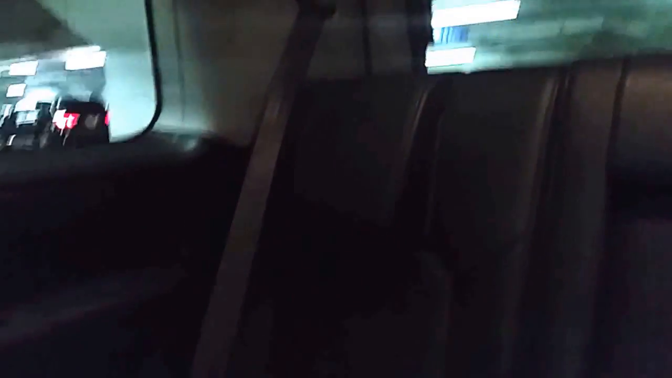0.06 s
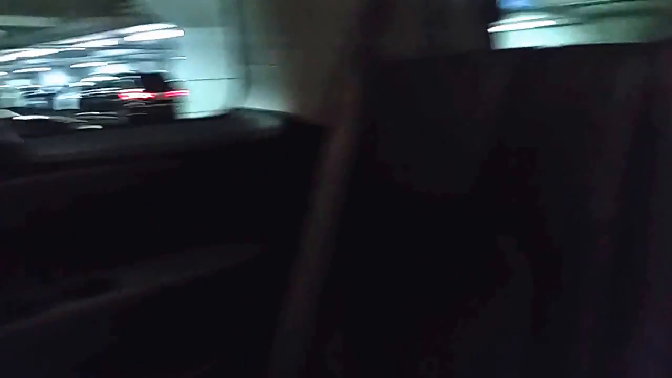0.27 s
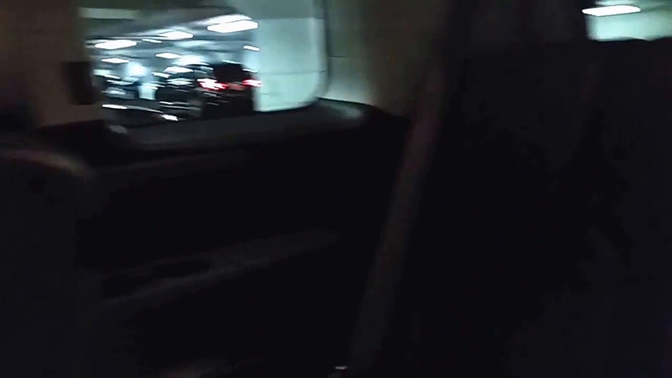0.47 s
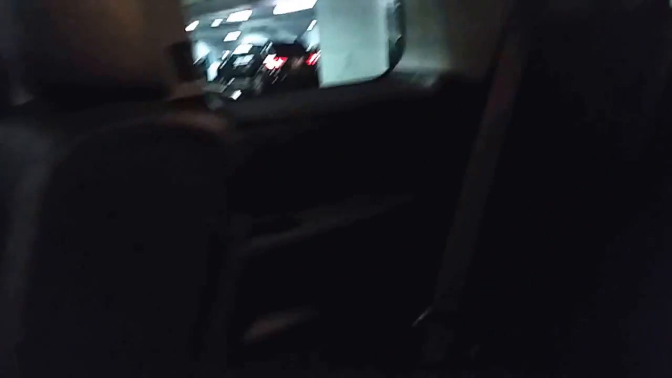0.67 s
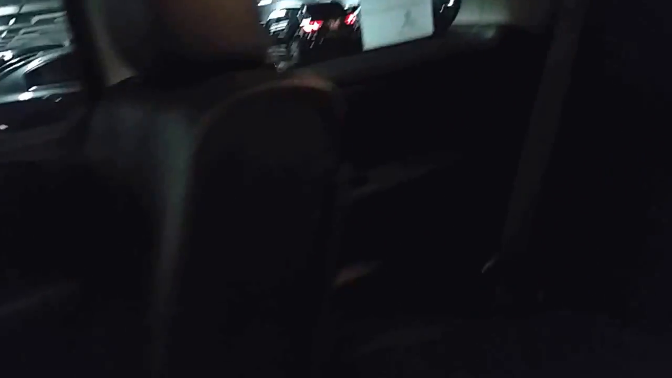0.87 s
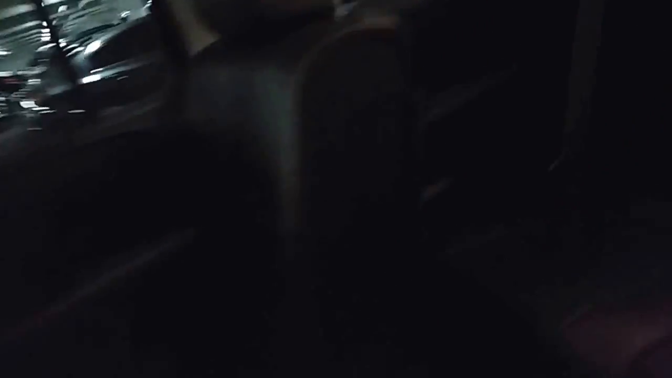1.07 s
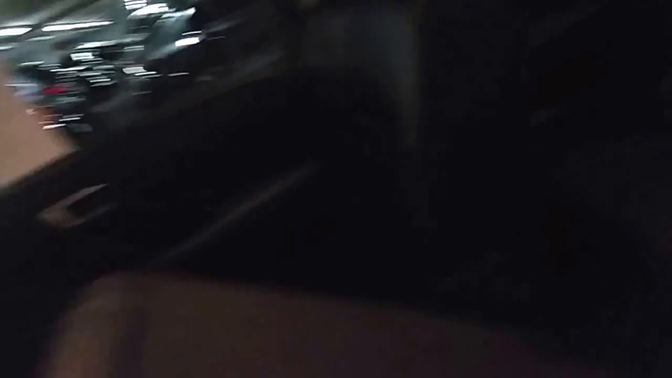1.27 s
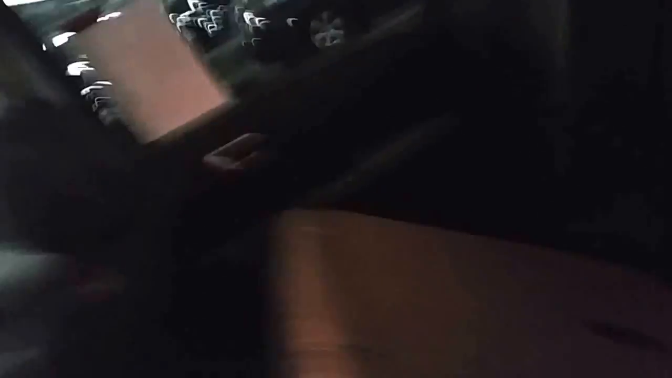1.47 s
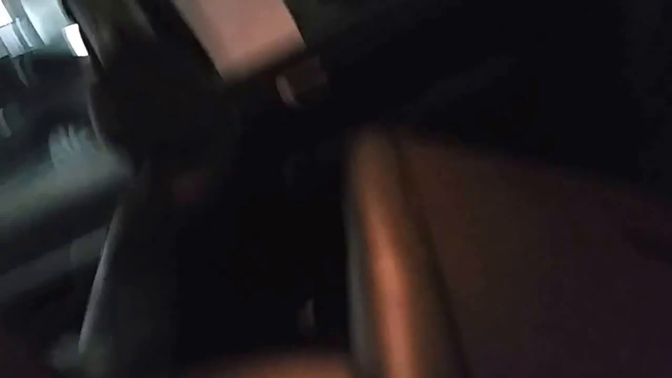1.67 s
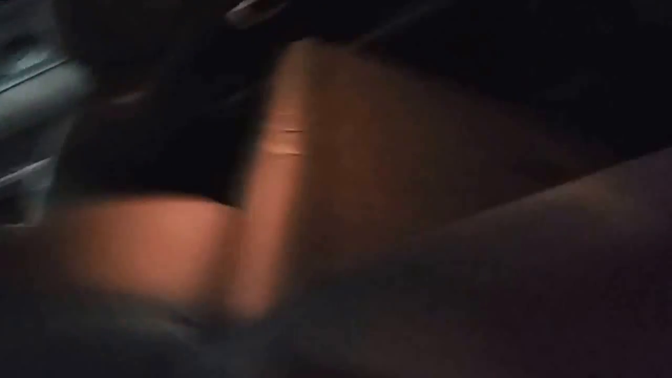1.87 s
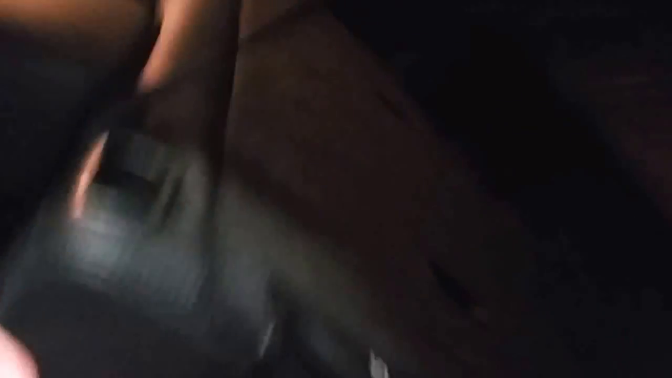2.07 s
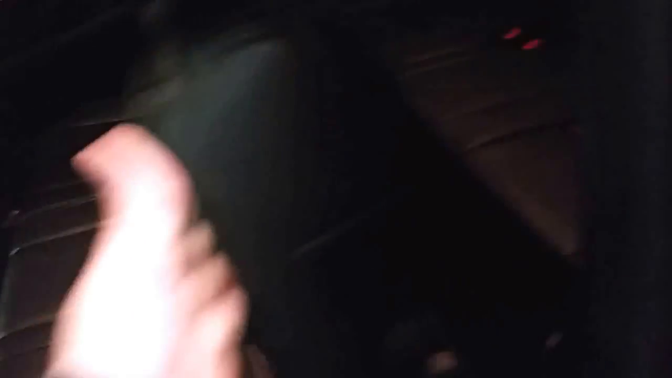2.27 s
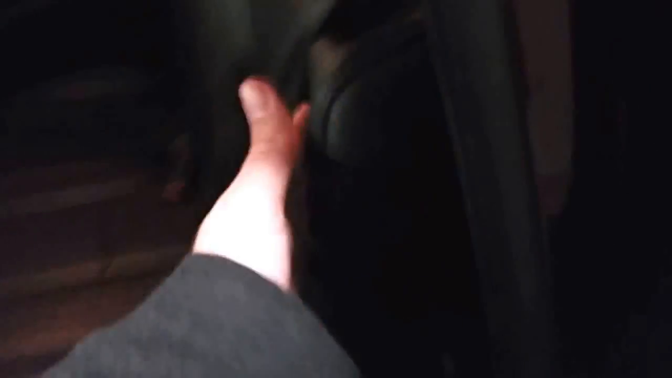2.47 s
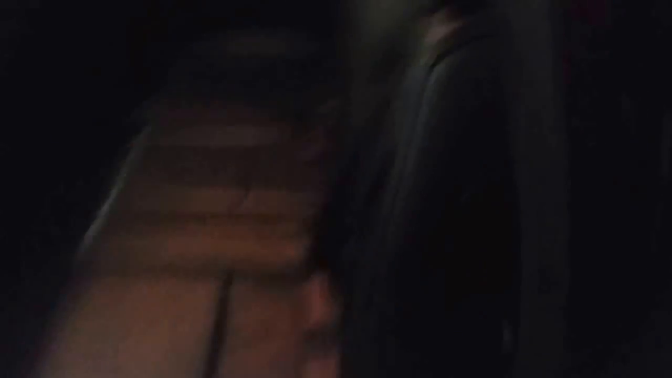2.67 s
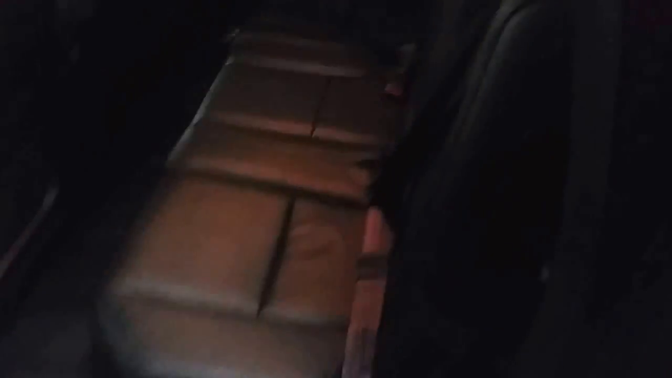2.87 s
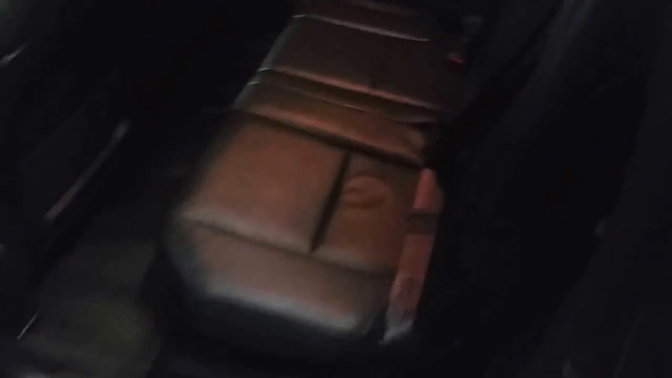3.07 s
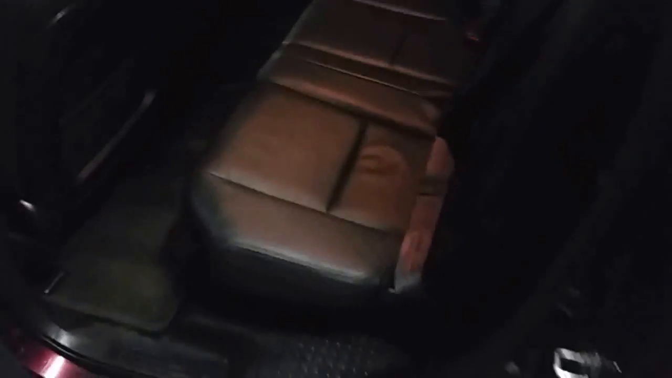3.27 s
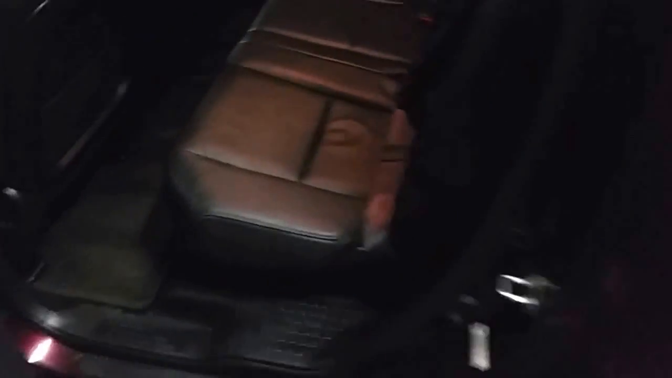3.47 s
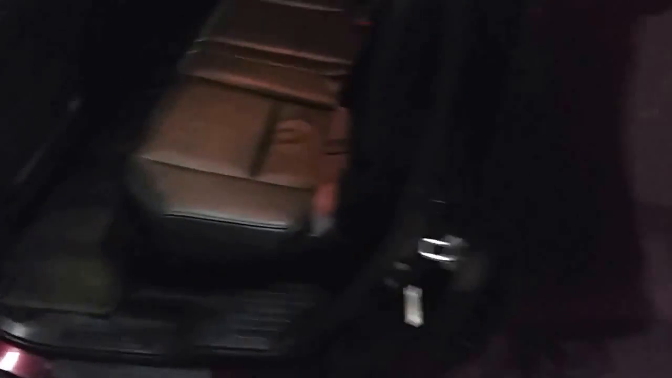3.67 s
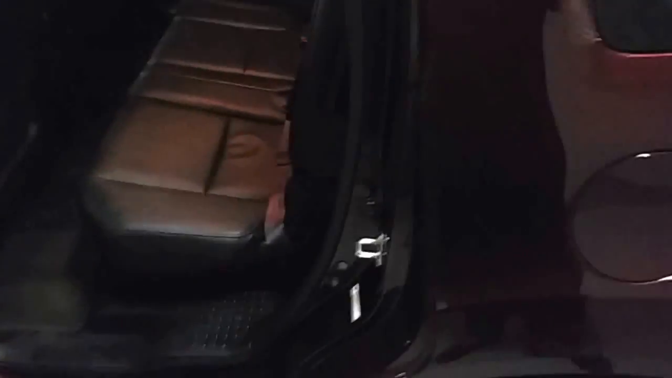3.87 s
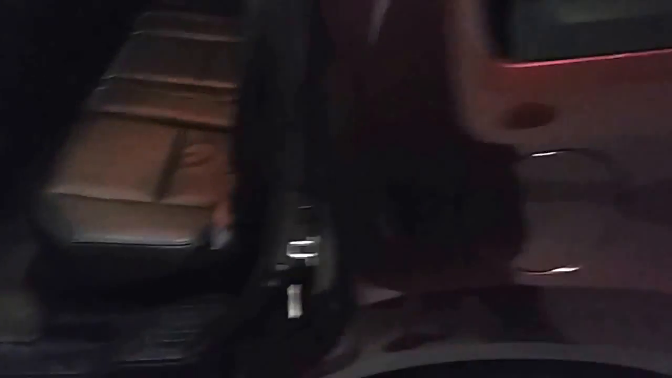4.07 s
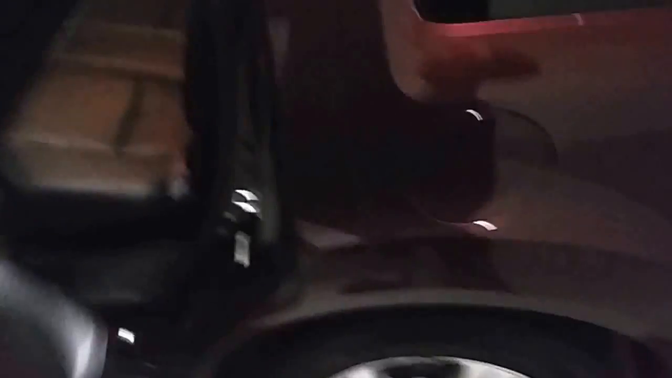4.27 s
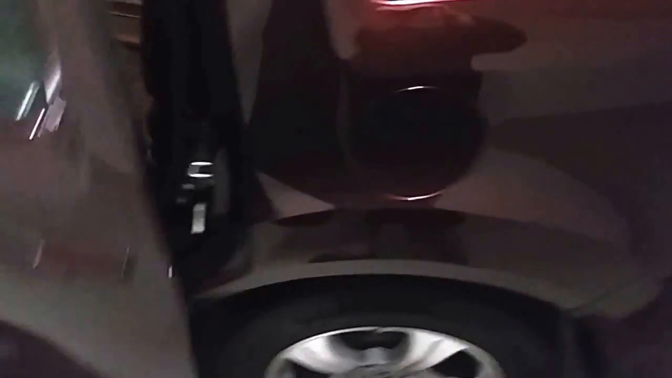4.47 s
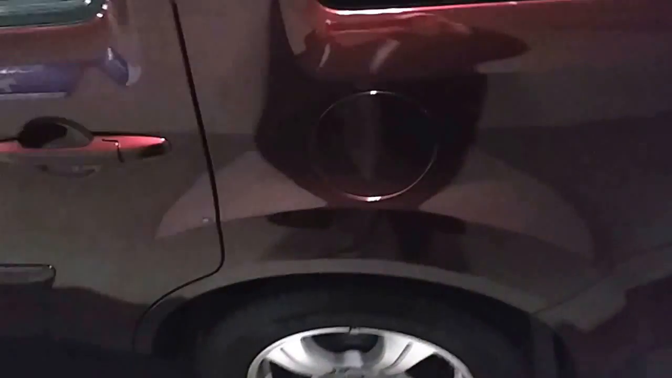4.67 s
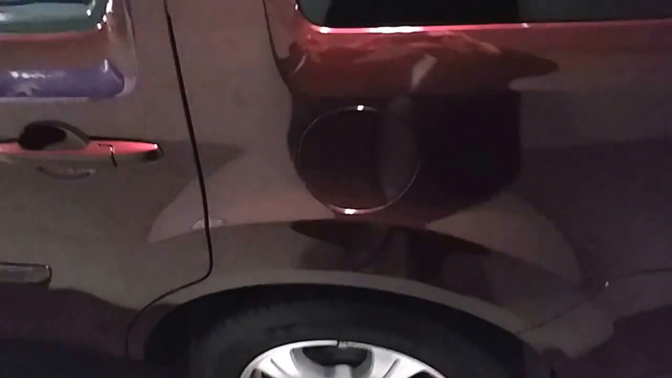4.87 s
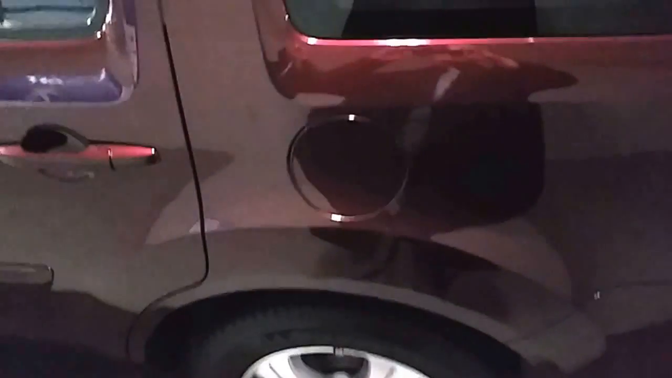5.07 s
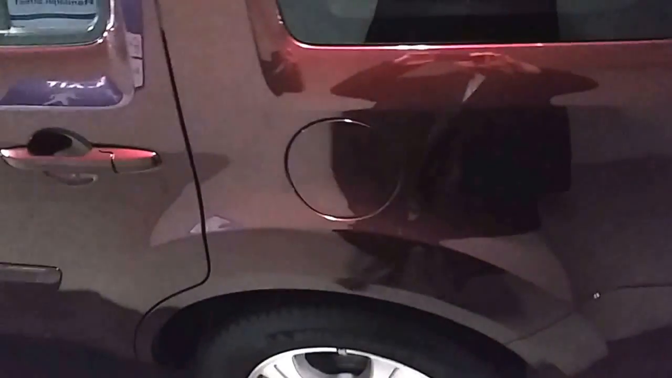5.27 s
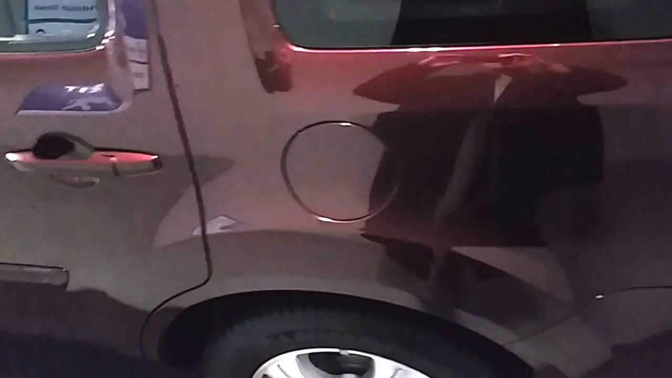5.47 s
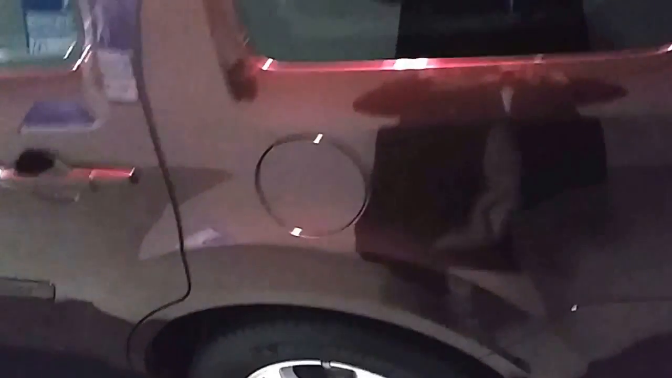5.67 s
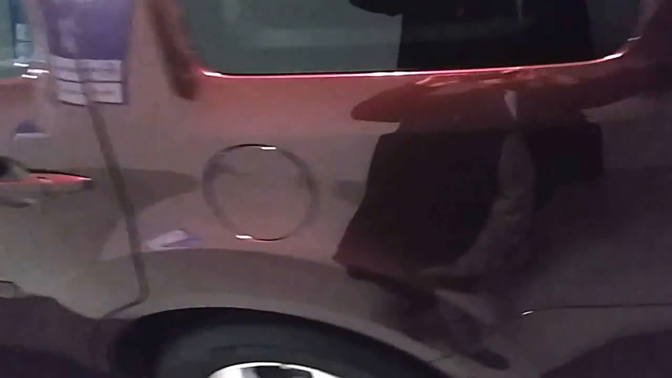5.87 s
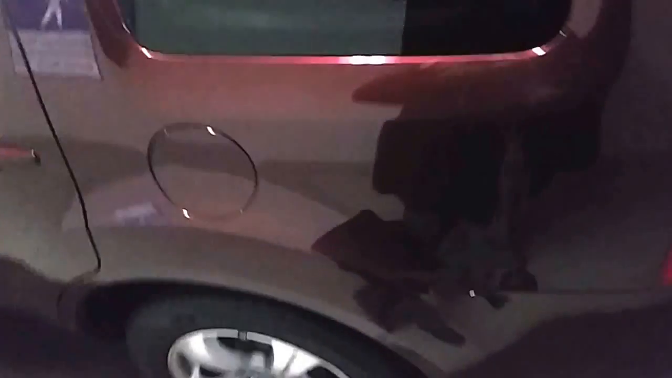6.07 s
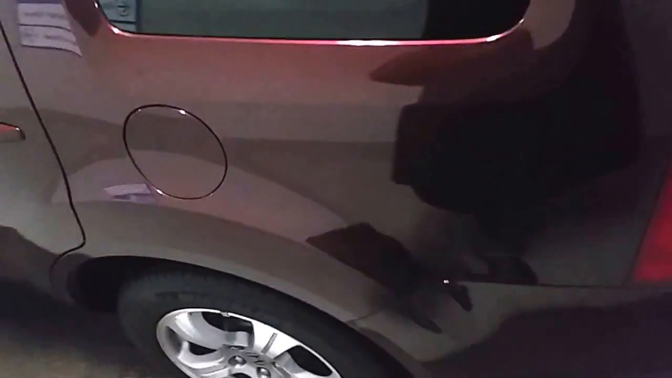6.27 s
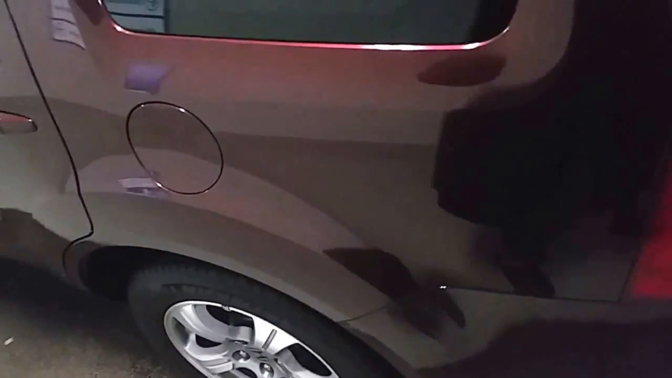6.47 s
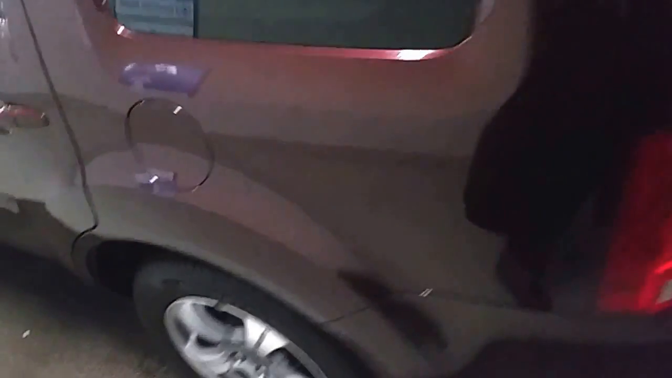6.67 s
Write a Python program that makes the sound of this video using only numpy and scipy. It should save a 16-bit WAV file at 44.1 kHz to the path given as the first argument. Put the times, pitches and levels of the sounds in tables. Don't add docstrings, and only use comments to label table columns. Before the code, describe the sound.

Close, hand-held stereo pickup with uneven coloration between channels. Dull taps come first over steady low garage air, then light knocks and a crisp latch. A heavy folding seat crashes in a cluster of low blows with spring squeaks. Tiny clicks and high creaks precede a single massive door slam with a metallic latch ring and deep hum, fading into rumble before a few palm bumps.

```python
import sys
import numpy as np
from scipy import signal
from scipy.fft import rfft, irfft, next_fast_len
from scipy.io import wavfile
from scipy.ndimage import uniform_filter1d, map_coordinates

SR = 44100
rng = np.random.default_rng(int(sys.argv[2]) if len(sys.argv) > 2 else 0)


def attenuation_scalar(level_db):
    decades = np.asarray(level_db, float) / 20
    return 10 ** decades


def pcm_store(signal):
    levels = np.round(np.clip(np.atleast_2d(signal), -1, 1) * 32767)
    wavfile.write(sys.argv[1], SR, levels.astype(np.int16).T)


N = 296325
TIME = np.arange(N) / SR

# [f/Hz, likeness 0..1]
DIFFUSE = [(60, 0.85), (180, 0.99), (550, 0.53), (1300, 0.18), (3500, 0.075), (15000, .05)]
# [f/Hz, level/dB]
HISS = [(500, -56), (1500, -6), (3000, -1), (6000, 0.5), (11000, -4.5), (16000, 0)]
# [t/s, level/dB]
OPEN = [(0.0, -17.5), (0.32, -15.5), (0.47, -10.5), (0.94, -1.5), (1.6, 0), (1.85, 1.5), (2.1, -1),
        (2.5, 0.5), (3.0, -2), (3.4, 0.5), (4.5, 1.5), (4.79, -2.5), (5.0, -9), (5.29, -4), (5.61, 1.5),
        (6.72, 1)]
# [f/Hz, width/Hz, level/dB]
DOOR = [(31, 9.6, 2), (61.3, 5.8, 3), (79, 20, -4.5), (112.4, 16, 1), (163.5, 26, -4), (222.3, 23, -2.5),
        (268, 22, -15)]


def unit(x):
    return x / np.sqrt(np.mean(x ** 2) + 1e-20)


def along(points, hz):
    f, v = np.transpose(points)
    return np.interp(np.log(hz + 1), np.log(f + 1), v)


def curve(points):
    s, v = np.transpose(points)
    return np.interp(TIME, s, v)


def wobble(rate):
    knots = rng.standard_normal(int(N * rate / SR) + 4)
    return map_coordinates(knots, [TIME * rate])


def filtered(x, response):
    m = next_fast_len(x.shape[-1] + 8192)
    return irfft(rfft(x, m) * response(np.fft.rfftfreq(m, 1 / SR)), m)[..., :x.shape[-1]]


def shaped(points):
    return lambda hz: attenuation_scalar(along(points, hz))


def resonances(modes):
    def response(f):
        total = 0
        for k, (centre, width, db) in enumerate(modes):
            damping = 1j * f * width
            total = total + (-1) ** k * attenuation_scalar(db) * damping / (centre ** 2 - f * f + damping)
        return total
    return response


def causal(points):
    cep = irfft(np.log(attenuation_scalar(along(points, np.fft.rfftfreq(2048, 1 / SR)))))
    cep[1:1024] *= 2
    cep[1025:] = 0
    return irfft(np.exp(rfft(cep)))


def rush(colour, alike, patchy_db, lag=0):
    z = signal.stft(rng.standard_normal((2, N)), nperseg=512)[2]
    field = uniform_filter1d(rng.standard_normal(z.shape[1:]), size=6, axis=0)
    field = uniform_filter1d(field, size=12, axis=1)
    pair = signal.istft(z * attenuation_scalar(patchy_db * unit(field)), nperseg=512)[1][:, :N]

    def spread(hz):
        turn = np.arccos(np.clip(along(alike, hz), -1, 1)) / 2
        return colour(hz) * np.array([np.cos(turn), np.sin(turn)])

    mid, side = filtered(pair, spread)
    return unit(np.array([mid + side, np.roll(mid - side, round(lag * SR))]))


def steady(x):
    power = uniform_filter1d(np.mean(x ** 2, 0), round(0.0404 * SR))
    return x / np.sqrt(np.abs(power) + 0.055)


def add(track, s, sound):
    at = track[..., round(s * SR):][..., :sound.shape[-1]]
    at += sound[..., :at.shape[-1]]


def swell(s, rise, t60, hold=0):
    t, shape = TIME[:round((hold + 2 * t60) * SR)], np.zeros(N)
    decay = np.exp(-np.log(1000) * np.clip(t - hold, 0, None) / t60)
    add(shape, s, (1 - np.exp(-t / rise)) * decay)
    return shape


def garage_air():
    # [f/Hz, level/dB]
    rumble_colour = [(20, -0.5), (45, -1), (100, 2.5), (170, -1), (260, -8), (420, -12.5), (800, -18.5),
                     (2000, -52)]
    # [f/Hz, level/dB]
    drone_colour = [(150, -10), (330, 1), (500, -7), (640, -3), (720, 0.5), (830, 1), (930, -4), (1300, -6),
                    (1520, -7.5), (1640, -4), (1780, -8.5), (2700, -10), (5000, -18.5), (12000, -27.5)]
    # [t/s, level/dB]
    lean_out = [(0, 0), (1.45, 0), (1.6, -2), (1.9, -2), (2.1, 0), (3.6, 0), (3.9, -2), (4.25, -2),
                (4.6, 0), (5.1, -1), (5.5, 0), (6.72, 1)]
    open_db, lean_db = curve(OPEN), curve(lean_out)
    outside = np.clip((TIME - 2.73) / 1.3, 0, 1)
    rolls = sum(attenuation_scalar(db) * swell(s, 0.037, 0.88) for s, db in [(2.24, -23), (4.45, -27.5)])
    rumble_db = -35.5 + 0.064 * open_db - 3.5 * outside + lean_db
    drone_db = -41 + 0.53 * open_db + 3 * outside - 0.45 * lean_db
    rumble = rush(shaped(rumble_colour), DIFFUSE, patchy_db=0.23, lag=0.00013)
    drone = rush(shaped(drone_colour), DIFFUSE, patchy_db=1.0, lag=0.00015)
    return np.hypot(attenuation_scalar(rumble_db), rolls) * rumble + attenuation_scalar(drone_db) * drone


def air_hiss():
    return attenuation_scalar(-42.5 + curve(OPEN)) * rush(shaped(HISS), DIFFUSE, patchy_db=1.6)


def cabin_hum():
    # [f/Hz, level/dB, t60/s]
    modes = [(29.88, -17.5, 1.62), (58.5, -17.5, 1.47), (63, -21, 0.85), (228.4, -25, 0.86)]
    t = np.clip(TIME - 4.366, 0, None)
    hum = 0
    for hz, db, t60 in modes:
        tone = np.sin(2 * np.pi * hz * t + 0.6 * wobble(9))
        hum = hum + attenuation_scalar(db - 60 * t / t60) * (1 - np.exp(-t / 0.044)) * tone
    return hum


def cloth_rub():
    # [t/s, length/s, level/dB, brightness/dB]
    strokes = [(0.866, 0.13, -37.5, 0), (1.001, .03, -38.5, -5), (1.057, .16, -42, -2),
               (1.028, 0.44, -44.5, 0), (1.368, 0.055, -37, 3), (1.476, 0.026, -46, 4),
               (1.748, 0.19, -42.5, -1), (2.097, 0.011, -26, 2), (2.225, 0.011, -29, -1),
               (2.3, 0.21, -41.5, -0.5), (3.21, 0.13, -46, 0), (3.35, .06, -52, 6), (3.41, 0.048, -49, 10),
               (4.393, .015, -37, -3)]
    noise = rush(shaped(HISS), DIFFUSE, patchy_db=1.6)
    dull = filtered(noise, lambda hz: 1 / (1 + (hz / 8000) ** 4))
    bright = noise - dull
    grains = attenuation_scalar(1.0 * wobble(29.66) + 2.0 * wobble(250))
    dull_gain, bright_gain = np.zeros((2, N))
    for s, length, db, bright_db in strokes:
        stroke = swell(s, 0.0063, 0.15, length)
        dull_gain += attenuation_scalar(db - bright_db) * stroke
        bright_gain += attenuation_scalar(db + bright_db) * stroke
    return grains * (dull * dull_gain + bright * bright_gain)


def case_knocks(rows, ring_hz, width_hz, plain):
    track, t = np.zeros((2, N)), np.arange(2048) / SR
    late = np.clip(t - .0015, 0, None)
    push = late * np.exp(-late / 0.00042) - .5 * t * np.exp(-t / 0.000087)
    knock = filtered(push, resonances([(ring_hz, width_hz, 0)]))
    knock = knock / np.abs(knock).max() + plain * push / push.max()
    knock = knock / np.abs(knock).max()
    tick = -np.exp(-t / 0.00016) * np.cos(2 * np.pi * 1500 * t)
    for s, db, tick_db, pan_db in rows:
        add(track, s, attenuation_scalar(db) * (knock + attenuation_scalar(tick_db) * tick) * attenuation_scalar([[pan_db / 2], [-pan_db / 2]]))
    return track


def hand_on_phone():
    # [t/s, peak level/dB, tick level/dB, left over right/dB]
    taps = [
        (0.2077, -36, -14, 16),
        (0.2718, -18.5, -11.5, 11),
        (0.325, -19, -16, 11),
        (0.3955, -20, -14, 13),
        (0.454, -17.5, -2.5, 7.5),
        (0.7566, -23.5, 5, 15.5),
        (1.149, -21, 1, 13),
    ]
    # [t/s, peak level/dB, tick level/dB, left over right/dB]
    bumps = [
        (5.4525, -25, -35, 13),
        (5.4675, -19.5, -32, 21),
        (5.4857, -20, -32, 22),
        (5.942, -29, -30, 21),
    ]
    return case_knocks(taps, 403, 150, 1.06) + case_knocks(bumps, 138, 85, -.15)


def held_ring(db, start_hz, end_hz, length, width_hz, firm):
    t = np.arange(round((2 * length + 0.12) * SR)) / SR
    drive = rng.standard_normal((3, len(t)))
    slow = filtered(drive, lambda f: 1 / (1 + (2 * f / width_hz) ** 2))
    phase = 2 * np.pi * np.cumsum(start_hz + (end_hz - start_hz) * np.clip(t / length, 0, 1)) / SR
    across = slow[1] + 0.24 * np.array([slow[2], -slow[2]])
    tone = unit((firm * np.std(slow) + slow[0]) * np.cos(phase) + across * np.sin(phase))
    fade_t60 = 0.029 + 1.7 * length
    shape = (1 - np.exp(-t / 0.00031)) * attenuation_scalar(-60 * np.clip(t - length, 0, None) / fade_t60)
    return attenuation_scalar(db - 6.0) * tone * shape


def creaks():
    # [t/s, peak level/dB, f/Hz, length/s]
    events = [
        (3.36, -35, 11400, .006),
        (3.374, -33, 14000, .003),
        (3.397, -30.5, 13000, .003),
        (3.411, -26, 11400, 0.0036),
        (3.438, -27.5, 12500, 0.0085),
    ]
    track = np.zeros((2, N))
    for s, db, hz, length in events:
        add(track, s, held_ring(db, hz, hz, length, .24 * hz, firm=.45))
    return track


def squeaks():
    # [t/s, peak level/dB, start f/Hz, end f/Hz, length/s]
    events = [(1.012, -41, 1400, 1300, .018), (1.05, -35, 950, 950, .008), (1.085, -39, 1350, 1620, .025),
              (1.093, -39, 2400, 2400, .015), (1.402, -26, 2500, 2200, 0.0077),
              (1.446, -35, 6800, 6800, 0.01), (2.141, -22, 3520, 3750, 0.0071),
              (2.159, -20.5, 3900, 3540, 0.0031), (2.305, -35.5, 2150, 2280, 0.035),
              (2.333, -31, 2140, 2250, .006), (2.348, -29, 2110, 2310, .008),
              (2.372, -27, 2330, 2400, 0.015), (2.394, -28, 2380, 2450, 0.011),
              (2.358, -34, 2024, 2135, 0.042), (2.43, -38, 2080, 2050, 0.05),
              (2.49, -41, 1890, 1910, 0.048), (2.58, -48, 2010, 1935, 0.1), (3.237, -36, 5000, 4060, .009),
              (3.3, -52, 6800, 6800, .07), (3.457, -46, 6800, 6800, .025), (4.3905, -22, 3620, 3520, .002),
              (2.142, -31, 1800, 1800, .008), (2.235, -32, 1950, 1960, .006),
              (2.236, -32, 4500, 4500, .005)]
    track = np.zeros((2, N))
    for s, db, start_hz, end_hz, length in events:
        width_hz = 530 / (1 + length / .07)
        add(track, s, held_ring(db, start_hz, end_hz, length, width_hz, firm=.45))
    return track


def pings():
    # [t/s, peak level/dB, f/Hz, length/s]
    events = [
        (4.352, -21, 493, 0.006),
        (4.357, -22, 1180, 0.0069),
        (4.382, -16.5, 760, 0.0043),
        (1.412, -28, 850, .004),
        (1.408, -24, 423, .004),
        (1.432, -23, 557, 0.0045),
        (1.4405, -31, 1900, 0.0043),
        (2.033, -12.5, 478, 0.0076),
    ]
    track = np.zeros((2, N))
    for s, db, hz, length in events:
        add(track, s, held_ring(db, hz, hz * (1 - 0.069), length, 0.63 * hz, firm=1.2))
    return track


def clean_rings(rows):
    track = np.zeros(N)
    for s, db, start_hz, end_hz, rise in rows:
        u = np.arange(round(9 * rise * SR)) / (rise * SR)
        glide = np.clip(u / 3.97, 0, 1)
        phase = 2 * np.pi * np.cumsum(start_hz + (end_hz - start_hz) * glide) / SR
        add(track, s, attenuation_scalar(db) * u * np.exp(1 - u) * np.sin(phase))
    return track


def strikes():
    # [t/s, peak level/dB, start f/Hz, end f/Hz, rise/s]
    events = [(4.3424, -13, 1290, 1210, 0.0011), (4.3458, -7.5, 1040, 1000, .0012),
              (4.349, -16, 1015, 960, .0025), (4.343, -17.5, 562, 480, 0.0041),
              (4.345, -22, 1950, 1950, .002), (4.3435, -15, 800, 760, .002), (4.344, -19, 1580, 1520, .002),
              (4.365, -15, 1250, 1200, .001), (4.3655, -15, 1740, 1650, .0012),
              (4.369, -17, 960, 900, .002), (4.3898, -17, 3640, 3550, .0012),
              (4.389, -19, 1600, 1550, .0015), (4.398, -20, 1180, 1120, .002),
              (1.038, -19, 400, 170, .0065), (1.027, -31, 720, 620, .003), (1.099, -21, 300, 260, .004),
              (1.11, -20, 210, 170, .004), (1.2815, -27, 2900, 2450, .0008), (1.086, -19, 460, 390, 0.0048),
              (1.092, -25, 780, 720, .003), (1.444, -21, 260, 240, .004), (1.444, -25, 566, 537, .003),
              (1.452, -29, 1100, 1080, .0015), (1.466, -20, 250, 230, .004), (1.466, -24, 580, 560, 0.0018),
              (1.481, -24, 240, 200, .003), (1.481, -26.5, 560, 580, 0.0026)]
    return clean_rings(events)


def thrums():
    # [t/s, peak level/dB, start f/Hz, end f/Hz, rise/s]
    events = [(2.102, -17.5, 280, 260, .007), (2.108, -18.5, 400, 390, .008),
              (2.15, -20.5, 510, 500, 0.0057), (2.186, -12.5, 200, 240, .011), (2.205, -18, 62, 58, .02),
              (2.165, -14.5, 125, 150, .014), (1.952, -23, 330, 430, .006), (1.972, -24, 130, 150, .008),
              (2.226, -13.5, 210, 165, .011), (2.228, -17.5, 330, 330, 0.0078),
              (2.298, -18.5, 395, 400, .009), (2.325, -16.5, 149, 139, 0.011), (2.33, -20, 234, 216, .01),
              (2.425, -18.5, 190, 185, .011), (4.4, -12.5, 260, 235, 0.0097), (4.44, -17.5, 150, 140, .012),
              (4.45, -16, 85, 70, .011), (4.5, -20, 55, 50, .025), (4.59, -26.5, 230.5, 225, 0.017)]
    return clean_rings(events)


def clacks():
    # [t/s, peak level/dB, tilt/dB per octave, t60/s]
    events = [(1.028, -31, -5, 0.07), (1.0895, -24, -4.5, 0.055), (1.18, -38, -4, 0.045),
              (1.2596, -29, -3, 0.055), (1.283, -31, -2, 0.06), (1.4019, -18, -1.5, 0.032),
              (1.4098, -13, -1, 0.06), (1.4415, -18, -1.5, 0.061), (1.4647, -20, -2, 0.016),
              (1.4795, -20.5, -2.5, 0.018), (1.9854, -12, -5, 0.038), (2.024, -20, -5, 0.038),
              (2.0336, -5.5, -3.5, 0.04), (2.084, -25, -3, .04), (2.0909, -4.5, -3, 0.055),
              (2.1446, -26, -6, 0.06), (2.18, -26.5, -9, 0.052), (2.2366, -22.5, -7.5, 0.06),
              (2.3333, -27.5, -11, 0.053), (2.376, -25.5, -5, 0.05), (2.461, -28.5, -4, 0.043),
              (2.513, -35, -4, 0.045), (3.0094, -30.5, -2, 0.03), (3.235, -26.5, -1.5, 0.03),
              (4.3437, -24, -10, 0.044), (4.366, -16.5, -3.5, 0.056), (4.3896, -16, -8.5, 0.05),
              (4.4015, -24, -6, 0.083), (4.83, -44, -12.5, 0.05)]
    track, t = np.zeros((2, N)), np.arange(SR // 5) / SR
    for s, db, tilt_db, t60 in events:
        shared, own = rng.standard_normal(len(t)), rng.standard_normal((2, len(t)))
        contacts = attenuation_scalar(2.3 * np.repeat(rng.standard_normal(len(t) // 30), 30))
        slope = lambda hz: attenuation_scalar(tilt_db * np.log2((hz + 250) / 4000)) * hz / (hz + 350)
        noise = filtered(0.87 * shared + 0.58 * own, slope)
        rattle_s = max(0.0066 + .00015 * db, .001)
        shape = (1 - np.exp(-t / 0.00017)) * attenuation_scalar(-60 * np.clip(t - rattle_s, 0, None) / t60)
        add(track, s, attenuation_scalar(db - 4.5) * noise * contacts * shape)
    return track


def seat_body(hz):
    # [f/Hz, width/Hz, level/dB]
    modes = [(59.3, 15, -2), (83, 15, 0.5), (118, 27, 1.5), (168, 26, 2.5), (229.3, 21.3, 1.5),
             (283.5, 26, -4.5), (347, 21, -12.5), (399, 31, -11.5)]
    return resonances(modes)(hz) * (1j * hz / (50 + 1j * hz)) ** 2


def shudder():
    # [t/s, boom level/dB, panel level/dB, boom t60/s, panel t60/s]
    events = [(1.03, -21, -26.5, 0.27, 0.31), (1.086, -27.5, -28, 0.78, 0.17), (1.165, -26, -40, 0.38, .3),
              (1.405, -24.5, -28.5, 0.38, 0.52), (1.93, -27.5, -34.5, 0.48, 1.2),
              (2.033, -37, -21, .3, .25), (2.095, -8.5, -17, 0.36, 0.21), (2.14, -28, -19.5, .3, 0.22),
              (2.165, -14.5, -26, 0.76, 1.14), (2.3, -19.5, -29, 0.91, 0.63),
              (4.364, -16.5, -18, 0.69, 0.5), (4.41, -17, -22, 0.48, 0.73), (4.5, -40, -36.5, .9, 1.4),
              (4.68, -28, -47, 0.8, 1)]
    # [f/Hz, likeness 0..1]
    near = [(60, 1), (180, 0.96), (550, 0.88), (1650, 0.14), (4970, 0.03), (15000, 0.02)]
    # [f/Hz, level/dB]
    panel_colour = [(150, -0.5), (300, 5.5), (400, 4.5), (480, 0), (560, 0), (700, -1.5), (830, -5.5),
                    (1050, -5), (1400, -11), (1900, -12), (4000, -29.5), (12000, -51)]
    door_boom = rush(resonances(DOOR), near, patchy_db=3.5)
    seat_boom = rush(seat_body, near, patchy_db=1.0)
    boom = steady(np.where(TIME > 4, door_boom, seat_boom)) * attenuation_scalar(1.2 * wobble(21.99))
    panels = steady(rush(shaped(panel_colour), near, patchy_db=-0.5))
    panels = panels * attenuation_scalar(1.4 * wobble(70))
    dull = filtered(panels, lambda hz: 1 / (1 + (hz / 1300) ** 2))
    boom_power, dull_power, bright_power = np.zeros((3, N))
    for s, boom_db, panel_db, boom_t60, panel_t60 in events:
        boom_power += (attenuation_scalar(boom_db) * swell(s, 0.011, boom_t60)) ** 2
        dull_power += (attenuation_scalar(panel_db) * swell(s, 0.004, panel_t60)) ** 2
        bright_power += (attenuation_scalar(panel_db) * swell(s, 0.004, .85 * panel_t60)) ** 2
    return np.sqrt(boom_power) * boom + np.sqrt(dull_power) * dull + np.sqrt(bright_power) * (panels - dull)


def blows():
    # [t/s, peak level/dB, contact time/s]
    events = [(1.037, -21, 0.0036), (1.045, -25, 0.0028), (1.052, -19, 0.0035), (1.0905, -22, 0.002),
              (1.109, -23, 0.0023), (1.409, -14, 0.0053), (1.417, -13.5, 0.0057), (1.426, -19, 0.0055),
              (1.445, -19, 0.002), (1.453, -22, .001), (1.467, -18, .0015), (1.4812, -17, 0.002),
              (2.036, -20, 0.002), (2.1, -4, 0.0043), (2.111, -6, .004), (2.1164, -4, .0045),
              (2.1234, -2, 0.0048), (2.164, -1, 0.0047), (2.186, -3.5, 0.0051), (2.241, -2, 0.0044),
              (2.2037, -6, 0.0038), (2.255, -8, 0.0051), (2.305, -10, 0.0048), (2.335, -8.5, 0.0056),
              (2.345, -9, 0.0051), (2.415, -16, .006), (2.448, -20, 0.0052), (2.483, -14, 0.0045),
              (2.527, -16, .005), (4.3658, 0.5, 0.0037), (4.3886, -1.2, 0.00355), (4.3933, -5, .004),
              (4.401, -5, .004), (4.41, -6, 0.0042), (4.421, -11, 0.0042), (4.433, -7, 0.0041),
              (4.452, -13, .005), (4.459, -11, 0.0073), (4.488, -12, 0.0085), (4.524, -13.5, 0.0083),
              (4.585, -20, 0.0053), (4.611, -20, 0.0048), (4.627, -17, .006), (4.662, -19, .007),
              (4.728, -19.5, 0.0066)]
    track, t = np.zeros((2, N)), np.arange(SR // 4) / SR
    for s, db, contact in events:
        push = np.sin(np.pi * np.clip(t / contact, 0, 1)) ** 2
        ring = filtered(push, resonances(DOOR) if s > 4 else seat_body)
        air = push - .5 * np.roll(push, round(contact * SR))
        add(track, s, attenuation_scalar(db) * (0.59 * air + 0.27 * ring / np.abs(ring).max()))
    return track


def echo(x):
    # [f/Hz, t60/s]
    decay = [(100, 0.63), (500, 1.76), (2000, 1.05), (10000, 0.74)]
    hz, t, z = signal.stft(rng.standard_normal((2, SR)), SR, nperseg=256)
    tail = signal.istft(z * attenuation_scalar(-60 * t / along(decay, hz)[:, None]), SR, nperseg=256)[1]
    late = np.pad(x, ((0, 0), (700, 0)))
    return signal.fftconvolve(late, tail / np.linalg.norm(tail[0]), axes=1)[:, :N]


def scene():
    background = garage_air() + air_hiss() + cabin_hum()
    handling = cloth_rub() + hand_on_phone()
    hard = creaks() + squeaks() + pings() + strikes() + thrums() + clacks()
    left, right = shudder() + blows()
    body = np.array([np.roll(left, round(.0003 * SR)), right])
    return background + handling + hard + attenuation_scalar(-13.5) * echo(hard) + body


def top_cut(x):
    return signal.sosfilt(signal.butter(12, 16950, fs=SR, output="sos"), x)


def record(dry):
    # [f/Hz, level/dB]
    left_port = [(60, 0), (500, 1.5), (2000, 0), (3200, 0), (4400, 5), (5600, 1), (6650, 8), (7300, 5.5),
                 (8000, -5), (8900, -14.5), (12000, -11.5), (15300, -12), (15900, -30), (16600, -43)]
    # [f/Hz, level/dB]
    right_port = [(60, 1), (500, -3), (2000, -3.5), (3000, -8), (4500, -20), (5700, -52), (6700, -28.5),
                  (8700, -12), (9600, -1), (10800, 7.5), (12000, 3), (13500, -6), (15400, -9), (16600, -35)]
    ports = np.array([causal(left_port), causal(right_port)])
    heard = signal.fftconvolve(dry, ports, axes=1)[:, :N]
    heard = filtered(heard, lambda hz: (hz < 16500) * attenuation_scalar(-19 * (hz > 15900)))
    limited = heard / (1 + np.abs(heard / .97) ** 8) ** (1 / 8)
    return top_cut(limited)


dry = scene()
out = record(dry)
pcm_store(out)
```